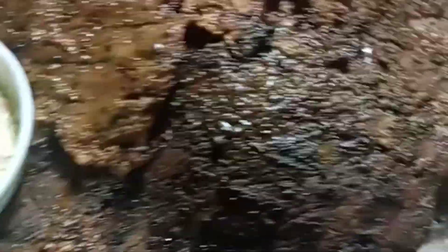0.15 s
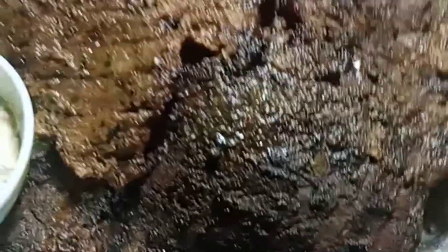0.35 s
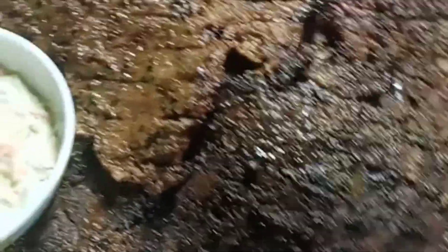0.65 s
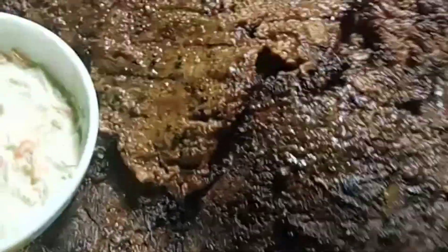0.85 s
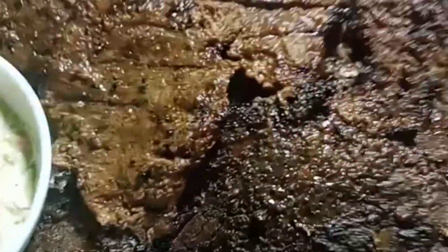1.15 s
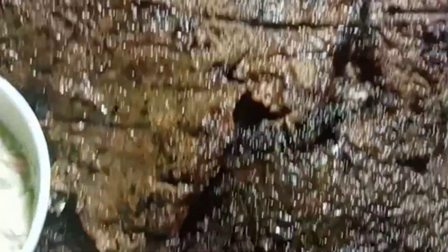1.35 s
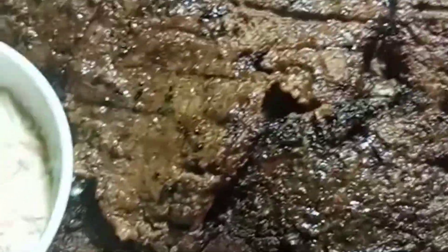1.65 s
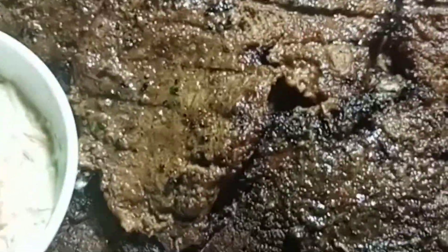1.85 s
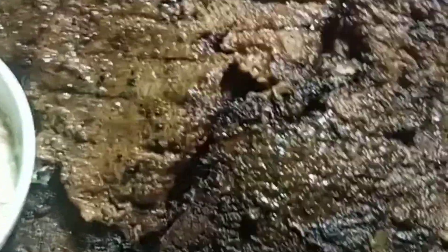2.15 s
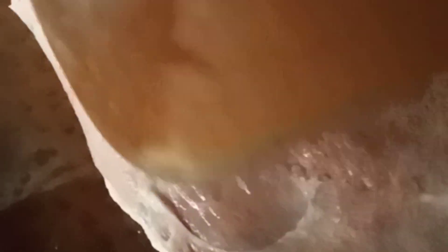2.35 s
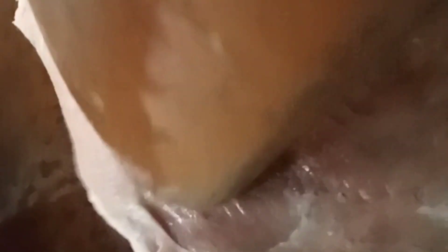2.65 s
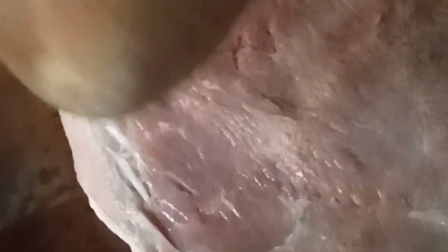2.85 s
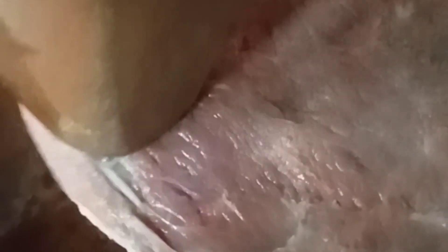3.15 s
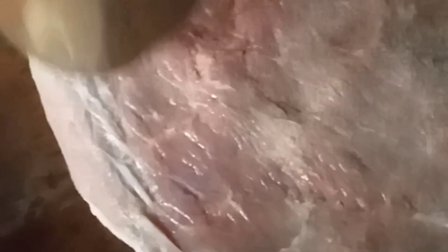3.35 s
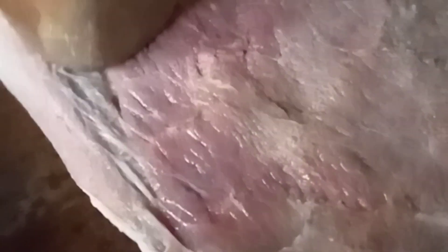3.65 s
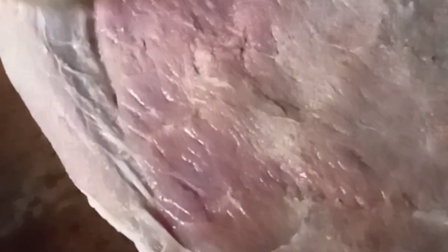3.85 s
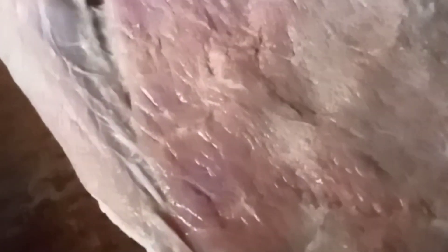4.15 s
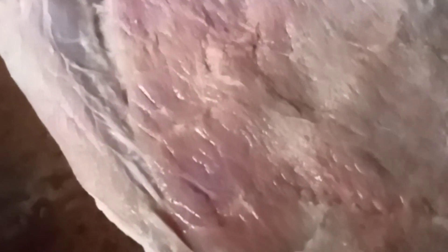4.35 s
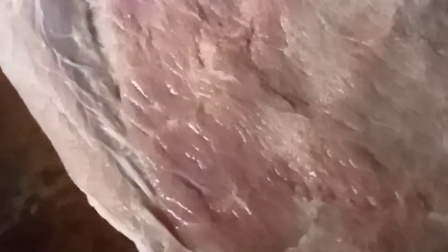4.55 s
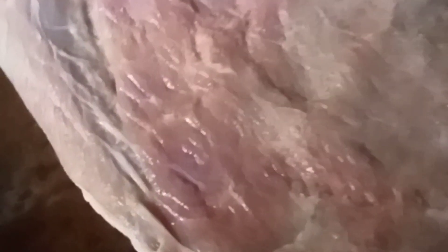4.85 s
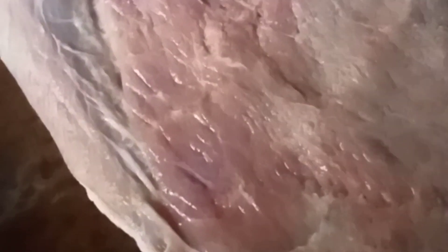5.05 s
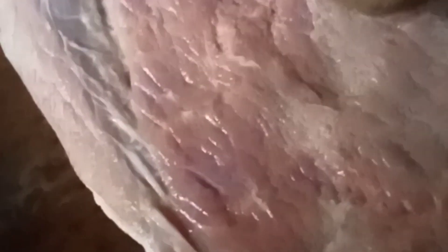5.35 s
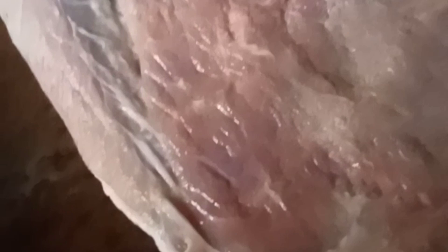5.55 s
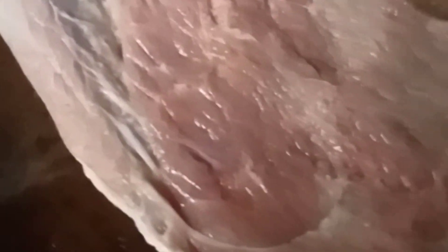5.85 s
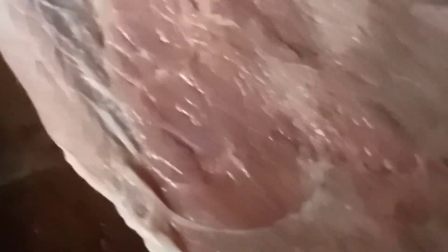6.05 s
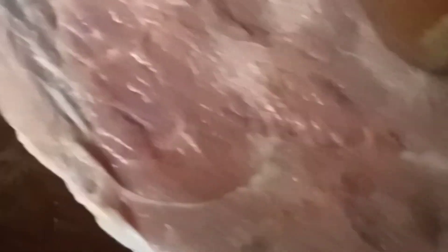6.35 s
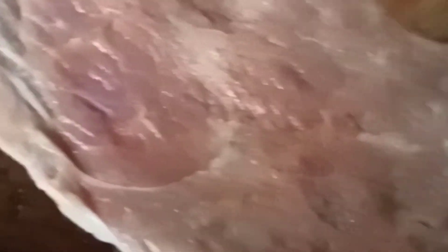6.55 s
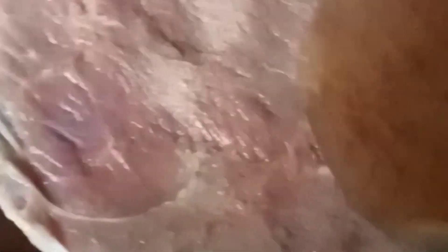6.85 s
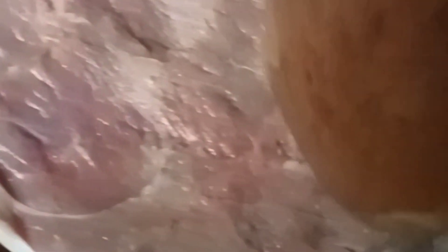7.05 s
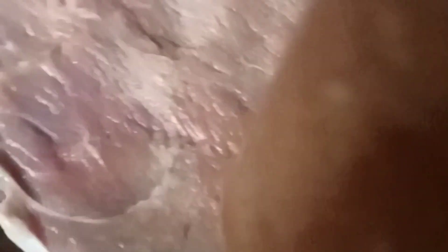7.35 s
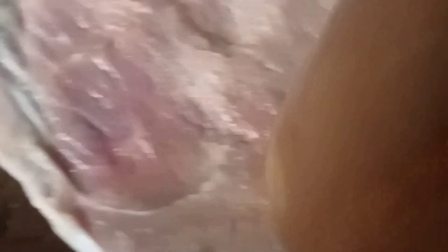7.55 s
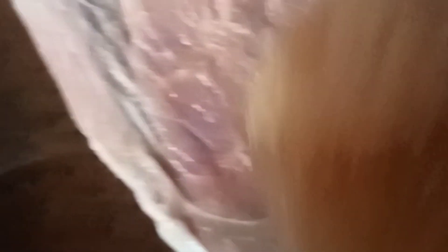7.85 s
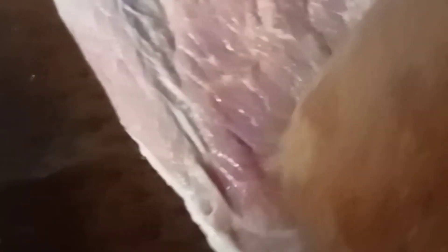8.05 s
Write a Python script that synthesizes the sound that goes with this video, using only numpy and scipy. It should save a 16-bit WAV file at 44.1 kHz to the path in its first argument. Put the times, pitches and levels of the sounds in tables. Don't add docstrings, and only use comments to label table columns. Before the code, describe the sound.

Bristles scrub a pot in gritty strokes, then after an abrupt cut a wooden pestle pounds meat under crackling plastic, with a faint distant cockerel.

```python
import sys
import numpy as np
from scipy import signal
from scipy.fft import rfft, irfft
from scipy.io import wavfile
from scipy.ndimage import uniform_filter1d

SR = 44100
rng = np.random.default_rng(int(sys.argv[2]) if len(sys.argv) > 2 else 0)


def log_audio(samples):
    frames = np.atleast_2d(samples).T
    limited = np.clip(frames, -1, 1)
    pcm = np.round(limited * 32767).astype(np.int16)
    wavfile.write(sys.argv[1], SR, pcm)


def nominal_scale(level):
    x = np.asarray(level, float) / 20
    return 10 ** x


N = 362061
T = np.arange(N) / SR

# (frequency [Hz], density [dB per Hz])
ROOM_SPECTRUM = [(15, -65), (25, -27), (60, 8), (154, -8.5), (313, -7.5), (584, -21), (831, -20),
                 (1390, -22.5), (1880, -22.5), (3700, -26), (4990, -40), (6400, -35), (7250, -25.5),
                 (7900, -34.5), (10000, -41), (12800, -44.5), (15400, -32), (15650, -70)]
ROOM_TONE_DB = -53
ROOM_BACK_S, ROOM_BACK_FROM_DB, ROOM_BACK_TIME_S = 2.293, -31, 0.059
ECHO_T60_S, ECHO_DB = 0.37, -15

# (time [s], pitch [Hz], level [dB])
CROW = [(5.12, 615, -89), (5.14, 628, -70), (5.2, 625, -72), (5.38, 673, -89), (5.44, 666, -65),
        (5.56, 647, -66), (5.65, 642, -67), (5.67, 600, -77), (5.7, 630, -80), (5.72, 645, -68),
        (5.8, 650, -68), (5.95, 662, -70), (6.08, 645, -71), (6.13, 644, -101)]
# (harmonic [number], level [dB])
CROW_HARMONICS = [(2, 4.5), (3, 4.5), (4, -5.5), (5, -22.5), (6, -27)]
# (start [s], end [s], pitch [Hz], level [dB])
PEEPS = [(5.03, 5.125, 1500, -65), (5.13, 5.18, 1480, -68), (5.68, 5.75, 1450, -65),
         (5.735, 5.82, 1490, -62), (2.815, 2.85, 3020, -58), (8.075, 8.127, 1850, -47),
         (8.073, 8.18, 2630, -55)]

# (frequency [Hz], density [dB per Hz])
SCRUB_SPECTRUM = [(15, -52), (25, -34), (48, 5.5), (135, 1.5), (202, -4.5), (339, -5.5), (831, -14),
                  (1510, -18.5), (2820, -16), (4990, -24.5), (6200, -11.5), (6950, -4.5), (7800, -11),
                  (10000, -12.5), (13300, -7.5), (15350, -18), (15750, -67)]
# (start [s], held [s], pressure over idle rubbing [dB])
STROKES = [(0.11, 0.16, 12), (0.45, 0.063, 3.5), (0.57, 0.12, 3), (0.72, 0.09, 4), (1.04, 0.082, 13),
           (1.2, 0.013, 6), (1.45, 0.1, 9), (1.76, 0.03, -2), (2.1, 0.025, 14), (2.2, 0.03, 13)]
# (start [s], held [s], level [dB])
BITES = [(0.695, 0.04, -43.5), (0.77, 0.022, -48.5), (0.9, 0.014, -44.5), (0.93, 0.014, -41.5),
         (1.235, 0.048, -43.5), (1.412, 0.165, -42.5), (1.48, 0.031, -36.5), (1.57, 0.0058, -39.5),
         (1.66, 0.023, -51), (1.757, 0.0074, -41.5), (1.8, 0.022, -49), (1.91, 0.02, -55)]
# (frequency [Hz], width [Hz], level [dB])
POT_MODES = [(1254, 25, -14), (1550, 50, -14), (1825, 40, 1), (1890, 60, -2), (1965, 55, -1),
             (2150, 90, -13), (2340, 70, -5), (2470, 80, -14), (3080, 45, -14), (3210, 50, -15),
             (3600, 80, -19)]
# (time [s], peak [dB], pitch [Hz], t60 [s])
POT_TAPS = [(0.452, -50, 990, 0.08), (0.578, -47, 1200, 0.06), (0.6, -50, 1050, 0.08),
            (0.635, -49, 900, 0.2), (0.735, -46, 570, 0.15), (0.77, -47, 590, 0.12),
            (0.77, -52, 3150, 0.08), (1.197, -46, 2250, .035), (1.316, -41, 1020, 0.039),
            (1.397, -39, 1120, 0.03), (1.885, -48, 530, 0.2), (1.93, -49, 520, .15), (0.31, -47, 560, .12)]
# (level [dB], share of pressure [dB per dB], drift [dB/s])
RUMBLE = (-45.5, 0.79, -0.62)
# (level [dB], share of pressure [dB per dB], drift [dB/s])
BRISTLES = (-46, 0.66, -6)
# (level [dB], share of pressure [dB per dB], drift [dB/s])
FINE_HISS = (-61, 0.51, -1.27)
STROKE_RISE_DB_S, STROKE_FALL_DB_S = 123, 113
BITE_RISE_DB_S, BITE_FALL_DB_S, BITE_IDLE_DB = 502, 330, -56.5
SCRUB_END_S = 2.215

# (time [s], peak [dB], pitch [Hz])
TICKS = [(0.4389, -53, 11480), (0.594, -48, 12000), (0.6004, -46, 12800), (0.7277, -45, 12800),
         (0.825, -47, 10800), (1.2276, -43.5, 12800), (2.7347, -55, 15300), (2.7741, -64, 15300),
         (2.7896, -58, 15300), (3.1954, -58, 10600), (3.2934, -43, 14800), (3.3044, -48, 14900),
         (3.3353, -54, 10400), (3.6506, -38, 15300), (3.7344, -54, 9160), (3.8072, -55, 9240),
         (3.8571, -52.5, 11500), (4.2986, -56, 15200), (4.3141, -42, 15200), (4.355, -59, 15000),
         (4.8604, -51, 14900), (5.2744, -54.5, 9050), (5.3847, -45, 15300), (5.4104, -44, 11600),
         (5.4194, -44, 14800), (5.4274, -52, 9480), (5.9748, -55, 15100), (5.9958, -49, 15100),
         (6.3959, -44.5, 9200), (6.4261, -52, 9540), (6.4394, -56, 15400), (6.5066, -50, 15200),
         (6.5211, -41, 15200), (6.9244, -56, 9000), (7.0389, -48, 15300), (7.3467, -52, 15200),
         (7.3667, -50, 14900), (7.4034, -46, 9300), (7.454, -39, 13400), (7.5592, -52, 9990),
         (7.6001, -41.5, 9000), (8.0431, -45, 15100), (8.1174, -53, 11500), (8.1873, -54, 15200)]
# (time [s], peak [dB], pitch [Hz])
SMACKS = [(3.646, -33, 2850), (3.838, -60, 3630), (3.857, -48, 3070), (4.2756, -49, 3300),
          (4.3299, -37, 3000), (7.0677, -58, 3300), (7.3471, -39.5, 2940), (7.99, -56, 3030),
          (8.13, -51, 2670), (2.7065, -30, 950), (7.1175, -29, 796)]
TICK_T60_S, SMACK_T60_S = 0.016, 0.028

# (frequency [Hz], density [dB per Hz])
CRACKLE_SPECTRUM = [(2650, -36), (4500, -8.5), (5410, -13.5), (6540, -3.5), (7370, -2.5), (8820, -7.5),
                    (9690, -13.5), (11000, -22), (14300, -51), (22000, -120)]
# (time [s], peak [dB], lower crackle [dB], upper crackle [dB], t60 [s])
CRUSHES = [(2.577, -45, 9, 7, 0.046), (2.5887, -49.5, 19, -14, 0.076), (3.1035, -38.5, 8.5, 11.5, 0.019),
           (3.1158, -36, 7, -20, 0.025), (3.1313, -44, 11, -15, 0.028), (3.6375, -44.5, 10.5, 2, 0.19),
           (4.165, -45, 8, 7, 0.034), (4.1715, -34.5, 16, 0, 0.04), (4.6908, -25.5, 4, 1, 0.023),
           (5.244, -27, -2.5, -5, 0.041), (5.8202, -43, 11, 4, 0.059), (6.351, -35.5, 7.5, 4, 0.068),
           (6.8841, -39, 12, -3, 0.082), (7.3828, -45, 14.5, -1, 0.036), (7.4135, -30.5, 0, 6, 0.035),
           (7.421, -36, 16, -13, 0.033), (7.9947, -46, 10, -1, 0.15)]
# (time [s], peak [dB], lower crackle [dB], upper crackle [dB])
PEELS = [(2.655, -51.5, 4, -8), (2.7154, -58, -2, -8), (3.293, -56, -16, 6), (3.756, -66.5, 23.5, -22),
         (3.855, -64, 8, -5.5), (4.2418, -58, 9, -21), (4.7637, -50.5, 7, 1), (4.872, -56, 6, 4),
         (5.395, -48, 1.5, 0), (5.9706, -60.5, 4, 4), (5.9964, -67, -9, -8), (6.43, -57, 6, 1),
         (6.9541, -51, -1, -1.5), (7.0434, -62, 13, 5), (7.3474, -64, 6, -14), (7.4544, -69, 1, -10),
         (7.4944, -49.5, 14, -6), (7.601, -62, 8, -10), (3.185, -51.5, 8, -6), (3.72, -55.5, 12, -8),
         (5.31, -62, 7, -10), (5.89, -59, 3, -7), (8.0662, -49.5, 5, 0)]
# (start [s], held [s], level [dB])
SLIDES = [(5.4, 0.025, -57), (7.12, 0.028, -54.5), (8.06, 0.15, -51.5)]
CRUSH_RISE_S, PEEL_RISE_S, PEEL_T60_S = 0.0021, 0.00082, 0.15
SLIDE_RISE_DB_S, SLIDE_FALL_DB_S = 219, 59

# (frequency [Hz], level [dB], t60 [s])
COUNTER_MODES = [(88, -9, 0.44), (98, -3, 0.1), (142.4, 16, 0.042)]
# (frequency [Hz], level [dB], t60 [s])
BOARD_MODES = [(207.9, 0, 0.09), (236.7, -5.5, 0.13), (274.8, 1.5, 0.1), (320.3, -5, 0.1),
               (416, -11.5, 0.08), (490.4, -12.5, 0.08)]
# (time [s], peak [dB], weight [dB], clack [dB], pitch [Hz])
BOUNCES = [(2.706, -25, -9, -15.5, 924), (3.24, -24.5, -2, -19, 960), (3.772, -29, -7, -20, 704),
           (4.278, -31, 1, -14, 805), (4.81, -25, 0.5, -15, 805), (5.359, -26.5, -3, -15, 873),
           (5.93, -27.5, -4, -17, 690), (6.472, -23, -1, -17.5, 690), (6.959, -31.5, 3, -4.5, 696),
           (7.489, -26.5, 1, -13, 820), (8.099, -33, 1, -13, 693)]
# (time [s], peak [dB], weight [dB], clack [dB], pitch [Hz])
ROCKS = [(2.821, -40, -4, -20, 925), (4.004, -52, 21.5, -3.5, 635), (4.329, -58, -14, 2.5, 1290),
         (4.882, -34.5, -26.5, -8, 786), (4.926, -40.5, -27, -13, 1230), (5.483, -47.5, 6, -7, 870),
         (5.57, -47, 2, -15, 580), (5.99, -46, 8, -5, 690), (6.586, -36.5, -1.5, -28, 660),
         (6.67, -50, 12.5, -9, 750), (7.006, -34.5, 2, -10.5, 734), (7.069, -32.5, -4, -8, 740),
         (7.118, -30, -1, -28, 673), (7.345, -31.5, 9, -14.5, 754), (7.368, -41, 2, -13.5, 600),
         (7.541, -30, 8.5, -8, 1570), (7.595, -33, 4, -23, 660), (7.657, -32.5, 4.5, -22, 746),
         (7.726, -39, 0, -24, 660), (8.173, -34, 12, -32, 650)]
# (time [s], peak [dB], pitch [Hz])
THUMPS = [(7.3455, -15.5, 145.8), (7.365, -22, 132), (7.562, -28, 305), (6.6, -35, 215), (4.012, -31, 84),
          (4.021, -38, 230)]
BOUNCE_BOOM_DB, ROCK_BOOM_DB = -24, -3.5

# (time [s], clatter [dB], knock [dB], meat push [dB])
BLOWS = [(2.596, -5, -6.5, -35), (3.124, -4.5, -4.5, -11), (3.658, -6, -4, -27), (4.1843, -8, -2, -25),
         (4.704, -4.5, -5.5, -24), (5.2526, -1.5, -10.5, -4), (5.8275, -6, -12, -21),
         (6.363, -2.5, -11, -10), (6.8922, -4, -9.5, -19), (7.427, -6, -6, -9), (8.007, -6, -6.5, -17)]
# (peak [dB], pitch [Hz], t60 [s], lead [s])
LOADS = [(-15.2, 167.0, 0.0691, 0.00732), (-18.6, 143.0, 0.0941, 0.00328), (-18.6, 156.0, 0.114, 0.00832),
         (-13.8, 148.0, 0.0378, 0.003), (-2.11, 189.0, 0.134, 0.00698), (-1.76, 115.0, 0.0451, 0.00672),
         (-11.8, 104.0, 0.0997, 0.00779), (-6.06, 105.0, 0.0854, 0.00698), (-7.19, 116.0, 0.0951, 0.00487),
         (-13.3, 85.0, 0.0351, 0.00661), (-8.01, 138.0, 0.0267, 0.00432)]
# (peak [dB], lag [s], free swing [s], lowest mode [Hz], t60 [s])
SWINGS = [(2.08, 0.000854, 0.0241, 215.0, 0.152), (2.06, 0.000556, 0.0239, 213.0, 0.24),
          (0.535, 0.000963, 0.022, 222.0, 0.146), (-0.686, 0.000954, 0.0246, 213.0, 0.123),
          (4.82, 0.000743, 0.0222, 190.0, 0.225), (-1.17, 0.000884, 0.0331, 185.0, 0.0503),
          (0.545, 0.000876, 0.0274, 230.0, 0.0963), (0.94, 0.00107, 0.0258, 224.0, 0.0907),
          (0.667, 0.00139, 0.046, 224.0, 0.14), (2.79, 0.001, 0.0338, 211.0, 0.106),
          (1.9, 0.000953, 0.0414, 215.0, 0.057)]
# (frequency [Hz], level [dB], t60 [s])
SECOND_MODES = [(271.0, -2.83, 0.448), (271.0, -3.15, 0.3), (273.0, 1.1, 0.262), (269.0, 0.495, 0.127),
                (262.0, 4.44, 0.0521), (254.0, -11.0, 0.6), (273.0, -7.74, 0.6), (260.0, -9.54, 0.347),
                (271.0, -9.13, 0.139), (278.0, 7.38, 0.0522), (272.0, 3.87, 0.066)]
# (frequency [Hz], level [dB], t60 [s])
THIRD_MODES = [(344.0, -1.62, 0.0519), (344.0, -1.49, 0.0742), (312.0, -17.7, 0.16), (343.0, -4.97, 0.04),
               (300.0, -3.4, 0.0866), (309.0, -9.17, 0.282), (363.0, -11.6, 0.0834), (323.0, -12.1, 0.558),
               (315.0, -9.33, 0.6), (387.0, -12.8, 0.285), (316.0, -2.48, 0.21)]
# (frequency [Hz], level [dB])
FOURTH_MODES = [(460, -11), (460, -8), (453, -6), (487, -14), (460, -14), (443, -8.5), (409, -18),
                (440, -21), (387, -15), (497, -5), (460, -5)]
# (frequency [Hz], level [dB], t60 [s])
EDGE_MODES = [(669, -11.5, 0.049), (993, 3.5, 0.039), (1136, 16.5, 0.013)]
# (frequency [Hz], level [dB], t60 [s])
KNOCK_MODES = [(1905, 6.3, 0.028), (2083, 19, 0.011), (2322, 13.5, 0.022), (3120, 1.5, 0.016),
               (3780, 0.5, 0.029)]
# (frequency [Hz], density [dB per Hz])
CLATTER_SPECTRUM = [(210, -14.5), (350, 1.5), (532, -4.5), (656, -7.5), (735, -8.5), (1140, -21),
                    (1360, -16.5), (1960, -17), (2800, -22), (4400, -32), (5000, -62), (7370, -42),
                    (11800, -60), (15000, -51.5), (16500, -80)]
# (frequency [Hz], width [Hz], level [dB])
LOOSE_MODES = [(673, 23, 11.5), (898, 35, -1.5), (1180, 74, -27.5), (1810, 50, -23), (1910, 160, -29),
               (2360, 110, -23), (2700, 370, -24.5), (3140, 990, 3.5)]
LANDING_DB, RESTING_T60_S = -17.5, 0.2
COUNTER_RING_DB = -24
CLATTER_RISE_S = 0.0036
LIFT_S, LIFT_DB = 0.058, -29.5

# (frequency [Hz], width [Hz], level [dB])
MIC_PORT = (7350, 900, 4)
MIC_LOW_HZ, MIC_TOP_HZ = 72.8, 15800


def level(x, db=0):
    return x * nominal_scale(db) / np.sqrt(np.mean(x ** 2))


def colour(x, spectrum, lo_hz=1, hi_hz=SR):
    f_hz = np.fft.rfftfreq(len(x), 1 / SR) + 1
    hz, db = np.transpose(spectrum)
    edges = 1 / np.sqrt((1 + (lo_hz / f_hz) ** 12) * (1 + (f_hz / hi_hz) ** 12))
    gain = nominal_scale(np.interp(np.log(f_hz), np.log(hz), db))
    return irfft(rfft(x) * gain * edges, len(x))


def walk(rate_hz):
    k = max(int(SR / rate_hz), 1)
    steps = np.repeat(rng.standard_normal(N // k + 1), k)
    return 0.86 * uniform_filter1d(uniform_filter1d(steps, k), k)[:N]


def ring(modes, drift=0.042, scatter_db=5.5, damp=1):
    hz, db, t60_s = np.transpose(modes)[:, :, None]
    balance, detune = rng.standard_normal((2, len(modes), 1))
    t = T[:SR // 3]
    fade = np.exp(-np.log(1000) * t * damp / t60_s)
    tones = np.sin(2 * np.pi * hz * (1 + drift * detune) * t)
    return np.sum(nominal_scale(db + scatter_db * balance) * fade * tones, axis=0)


def contact(x, ms):
    push = np.hanning(max(int(ms * SR / 1000), 3))
    y = signal.fftconvolve(x, push)[:len(x)]
    return y / np.abs(y).max()


def add(out, s, x):
    i = int(s * SR)
    out[i:i + len(x)] += x[:N - i]


def burst(rise_s, t60_s):
    t = T[:SR // 2]
    return (1 - np.exp(-t / rise_s)) * np.exp(-np.log(1000) * t / t60_s)


def swells(rows, rise_db_s, fall_db_s):
    s, held_s, db = np.transpose(rows)[:, :, None]
    rise_db = rise_db_s * np.maximum(s - T, 0)
    fall_db = fall_db_s * np.maximum(T - s - held_s, 0)
    return np.max(db - rise_db - fall_db, axis=0)


def resonate(x, peaks):
    out = 0
    for hz, width_hz, db in peaks:
        peak = signal.iirpeak(hz, hz / (1.5 * width_hz), SR)
        out = out + nominal_scale(db) * level(signal.lfilter(*peak, signal.lfilter(*peak, x)))
    return level(out)


def chatter(per_s=900, sharpness=8.8):
    out = 0
    for hz in 330 * 2 ** np.arange(0, 5.6, 0.25):
        hits = rng.random(N) < per_s / SR
        knocks = hits * rng.standard_normal(N) * nominal_scale(4 * walk(35))
        out = out + np.sqrt(hz) * level(signal.lfilter(*signal.iirpeak(hz, sharpness, SR), knocks))
    return level(out)


def kitchen():
    swell = walk(0.15)
    noise = rng.standard_normal(N)
    bands = np.zeros(N)
    for lo_hz in 18 * 2.0 ** (np.arange(20) / 2):
        flicker_db = 0.42 * swell + 2.0 * walk(6) + 0.96 * walk(45)
        bands += nominal_scale(flicker_db) * colour(noise, ROOM_SPECTRUM, lo_hz, np.sqrt(2) * lo_hz)
    back_db = ROOM_BACK_FROM_DB * np.exp(-np.maximum(T - ROOM_BACK_S, 0) / ROOM_BACK_TIME_S)
    return level(bands, ROOM_TONE_DB) * nominal_scale(back_db) * (T > ROOM_BACK_S)


def cockerel():
    s, hz, db = np.transpose(CROW)
    waver = 1 + 0.006 * walk(14) + 0.008 * walk(60)
    phase = 2 * np.pi * np.cumsum(np.interp(T, s, hz) * waver) / SR
    out = sum(nominal_scale(tone_db + 4.5 * walk(28)) * np.sin(k * phase) for k, tone_db in CROW_HARMONICS)
    out *= nominal_scale(np.interp(T, s, db, left=-120, right=-120))
    for start_s, end_s, hz, db in PEEPS:
        gate = np.clip(np.minimum((T - start_s) / 0.018, (end_s - T) / 0.013), 0, 1)
        out += gate * nominal_scale(db) * resonate(rng.standard_normal(N), [(hz, 60, 0)])
    return out


def scrubbing():
    pressure_db = np.maximum(swells(STROKES, STROKE_RISE_DB_S, STROKE_FALL_DB_S), 0)
    rumble_db, brush_db, hiss_db = (db + share * pressure_db + drift_db_s * np.minimum(T, SCRUB_END_S)
                                    for db, share, drift_db_s in (RUMBLE, BRISTLES, FINE_HISS))
    grit = nominal_scale(2.6 * walk(250) + 1.5 * walk(60)) * rng.standard_normal(N)
    rub = level(colour(rng.standard_normal(N), SCRUB_SPECTRUM, 1, 1620))
    deep = colour(rub, [(20, 0), (20000, 0)], 1, 200)
    out = nominal_scale(rumble_db) * (rub - deep * (1 - nominal_scale(-0.4 * pressure_db)))
    out *= nominal_scale(1.5 * walk(25))
    out += nominal_scale(brush_db + 1.0 * walk(26.7)) * level(colour(grit, SCRUB_SPECTRUM, 795, 3860))
    out += nominal_scale(hiss_db + 1.0 * walk(30)) * level(colour(grit, SCRUB_SPECTRUM, 4600))
    bite_db = np.maximum(swells(BITES, BITE_RISE_DB_S, BITE_FALL_DB_S), BITE_IDLE_DB)
    bite = nominal_scale(bite_db + 1 - 15 / (1 + nominal_scale(2 * (bite_db + 56))))
    out += bite * resonate(nominal_scale(0.53 * walk(180)) * rng.standard_normal(N), POT_MODES)
    for s, db, hz, t60_s in POT_TAPS:
        tap = ring([(hz, 0, t60_s), (1.07 * hz, -4, 0.5 * t60_s)], drift=0, scatter_db=0)
        add(out, s, nominal_scale(db + 8) * contact(tap, 0.6))
    return out * np.clip((SCRUB_END_S - T) / 0.0036, 0, 1)


def pops():
    out = np.zeros(N)
    for rows, t60_s, spread in ((TICKS, TICK_T60_S, 1.25), (SMACKS, SMACK_T60_S, 1.3)):
        for s, db, hz in rows:
            edges_hz = [hz / spread, min(hz * spread, 15700)]
            band = signal.butter(2, edges_hz, "band", fs=SR, output="sos")
            pop = signal.sosfilt(band, rng.standard_normal(4000) * burst(0.0004, t60_s)[:4000])
            add(out, s - 0.0005, nominal_scale(db - 1.5) * pop / np.abs(pop).max())
    return out


def sheet():
    snaps = nominal_scale(2.5 * rng.exponential(size=N) + 2.5 * walk(500)) * rng.standard_normal(N)
    swarms = np.zeros((3, N))
    peels = [(*row, PEEL_T60_S) for row in PEELS]
    for rows, rise_s in ((CRUSHES, CRUSH_RISE_S), (peels, PEEL_RISE_S)):
        for s, db, lower_db, upper_db, t60_s in rows:
            swarm = burst(rise_s, t60_s)
            for part, part_db in zip(swarms, (lower_db - 5.5, -5.0, upper_db - 8.5)):
                add(part, s - 0.001, nominal_scale(db + part_db) * swarm / swarm.max())
    lower_spectrum = [(500, -4), (1200, -11.5), (2000, -3.5), (3300, -0.5), (4500, -12)]
    lower = colour(snaps, lower_spectrum, 450, 3970)
    middle = colour(snaps, CRACKLE_SPECTRUM, 4700, 9600)
    upper = colour(snaps, [(9500, -5), (12500, -5), (14800, 0), (16000, -8)], 10500)
    out = sum(part * level(band) for part, band in zip(swarms, (lower, middle, upper)))
    slide = nominal_scale(swells(SLIDES, SLIDE_RISE_DB_S, SLIDE_FALL_DB_S))
    hiss_spectrum = [(1200, -0.5), (1700, 8.5), (2300, -3.0), (3100, 5.5), (4200, -9.0)]
    hiss = colour(rng.standard_normal(N), hiss_spectrum, 1100, 4400)
    return out + uniform_filter1d(slide, size=900) * level(hiss)


def board():
    out, clack, slap = np.zeros(N), np.zeros(N), np.zeros(N)
    for rows, boom_db in ((BOUNCES, BOUNCE_BOOM_DB), (ROCKS, ROCK_BOOM_DB)):
        for s, db, weight_db, clack_db, hz in rows:
            boom = contact(ring(COUNTER_MODES), 5.3)
            body = contact(ring(BOARD_MODES, scatter_db=4.0), 1.9)
            knock = contact(ring([(hz, 0, 0.04), (657, -10, 0.09)], scatter_db=4), 0.6)
            add(out, s - 0.003, nominal_scale(db + weight_db + boom_db) * boom)
            add(out, s, -nominal_scale(db + weight_db + 1.5) * body)
            add(out, s, nominal_scale(db - 2.5) * knock)
            add(slap, s, nominal_scale(db - 8.0) * burst(0.001, 0.052))
            add(clack, s, nominal_scale(db + clack_db + 1.0) * burst(0.0011, 0.083))
    for s, db, hz in THUMPS:
        thump = ring([(hz, 0, 0.05), (1.4 * hz, -4, 0.04)], drift=0, scatter_db=-1)
        add(out, s, nominal_scale(db) * contact(thump, 1.45))
    grit = chatter(per_s=610)
    out += slap * level(colour(grit, CLATTER_SPECTRUM, 830, 1130))
    return out + clack * level(colour(grit, CLATTER_SPECTRUM, 1300, 4600))


def pestle():
    out, shake = np.zeros(N), np.zeros(N)
    t = T[:SR // 3]
    per_blow = zip(BLOWS, LOADS, SWINGS, SECOND_MODES, THIRD_MODES, FOURTH_MODES)
    for blow, load, swing, second, third, fourth in per_blow:
        s, db, knock_db, push_db = blow
        load_db, load_hz, load_t60_s, lead_s = load
        swing_db, lag_s, held_s, low_hz, t60_s = swing

        give = contact(ring([(load_hz, 0, load_t60_s)], drift=0, scatter_db=0), 6.3)
        counter_modes = [(90.9, -7.5, 0.51), (103, -2.5, 0.13)]
        linger = contact(ring(counter_modes, drift=0.022, scatter_db=1.0), 7.8)
        add(out, s - lead_s, nominal_scale(load_db) * give)
        add(out, s - lead_s, nominal_scale(db + COUNTER_RING_DB) * linger)
        add(out, s - 0.0075, nominal_scale(db + push_db) * contact(ring(BOARD_MODES, damp=4.1), 7.6))

        landing = nominal_scale(LANDING_DB / (1 + np.exp((held_s - lag_s - t) / 0.0009)))
        landing *= nominal_scale(-60 * np.maximum(t - held_s, 0) / RESTING_T60_S)
        modes = [(low_hz, 0, t60_s), second, third, (*fourth, 0.1), (520, -20, 0.08), (380, -20, 0.1)]
        add(out, s + lag_s, -nominal_scale(swing_db) * landing * contact(ring(modes, drift=0, scatter_db=0), 1.5))

        edge = contact(ring(EDGE_MODES, drift=0.03, scatter_db=4.5), 0.42)
        knock = contact(ring(KNOCK_MODES, drift=0.024, scatter_db=5.5), 0.33)
        add(out, s + 0.00047, nominal_scale(db + knock_db + 7.0) * edge)
        add(out, s + 0.00041, nominal_scale(db + knock_db + 3.5) * knock)

        clatter = burst(CLATTER_RISE_S, 0.13) + nominal_scale(-17.5) * burst(0.017, 0.47)
        add(shake, s, nominal_scale(db - 13.5) * clatter)
        add(shake, s + LIFT_S, nominal_scale(db + LIFT_DB) * burst(0.006, 0.077))
    grit = nominal_scale(3 * walk(60)) * chatter()
    rattle = resonate(shake * nominal_scale(6 * walk(130)) * rng.standard_normal(N), LOOSE_MODES)
    out += shake * level(colour(grit, CLATTER_SPECTRUM))
    return out + nominal_scale(-12.5) * np.sqrt(np.mean(shake ** 2)) * rattle


def scene():
    work = pestle() + board() + sheet() + pops()
    t = T[:SR // 2]
    echo = rng.standard_normal(len(t)) * np.exp(-np.log(1000) * t / ECHO_T60_S) * (t > 0.004)
    echo = colour(echo, [(60, -5.0), (400, -11.5), (3000, -9.5), (8000, -5.5), (14000, -9)])
    room = signal.fftconvolve(work, echo / np.sqrt(np.sum(echo ** 2)))[:N]
    return (work + nominal_scale(ECHO_DB) * room + scrubbing() + kitchen() + cockerel())[None]


def low_pass(x):
    return signal.sosfilt(signal.butter(12, 16640, fs=SR, output="sos"), x)


def record(dry):
    hz, width_hz, db = MIC_PORT
    dry = dry + (nominal_scale(db) - 1) * signal.lfilter(*signal.iirpeak(hz, hz / width_hz, SR), dry)
    dry = signal.sosfilt(signal.butter(3, MIC_LOW_HZ, "high", fs=SR, output="sos"), dry)
    rounded = 1.024 * np.tanh(dry / 1.078)
    top = signal.ellip(8, 0.2, 50, MIC_TOP_HZ, fs=SR, output="sos")
    return low_pass(signal.sosfilt(top, rounded))


dry = scene()
out = record(dry)
log_audio(out)
```